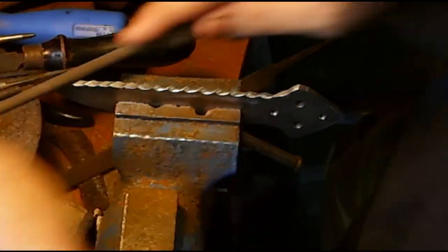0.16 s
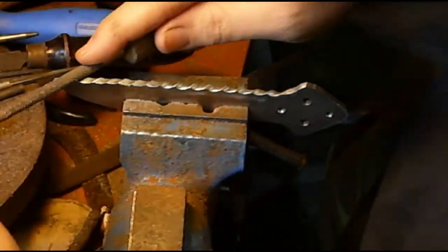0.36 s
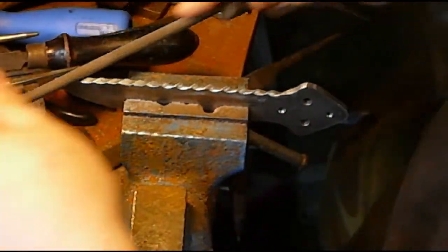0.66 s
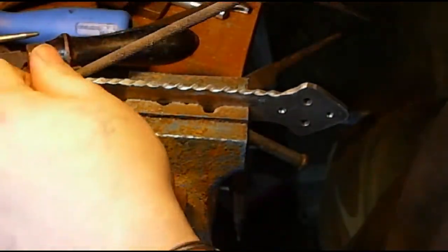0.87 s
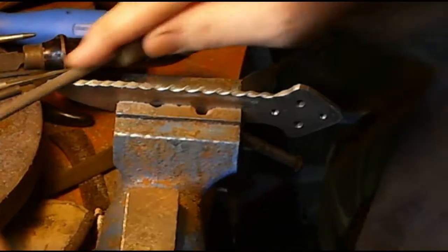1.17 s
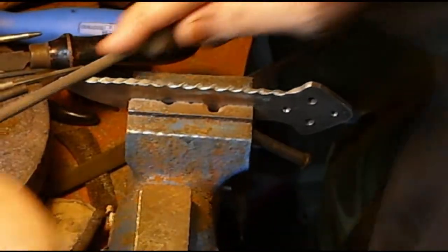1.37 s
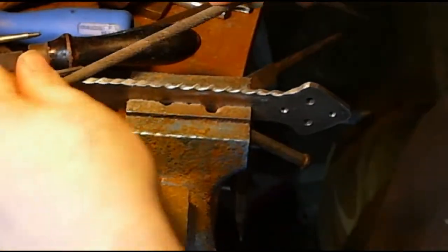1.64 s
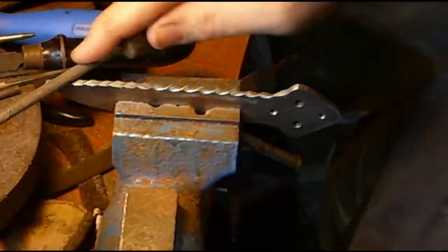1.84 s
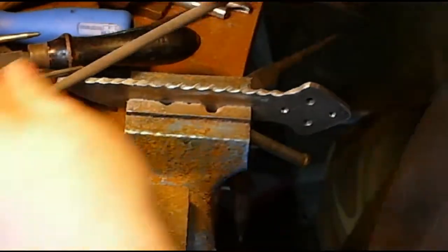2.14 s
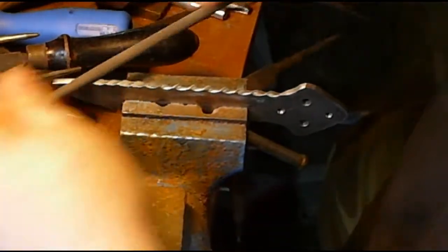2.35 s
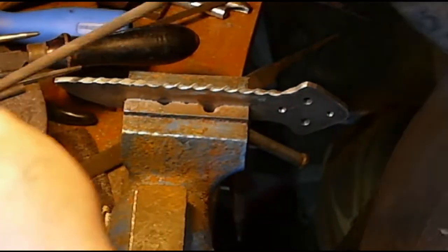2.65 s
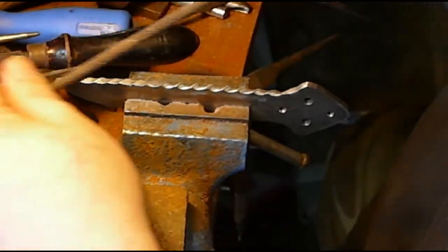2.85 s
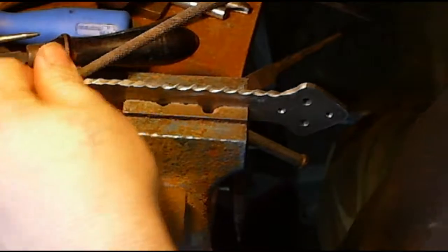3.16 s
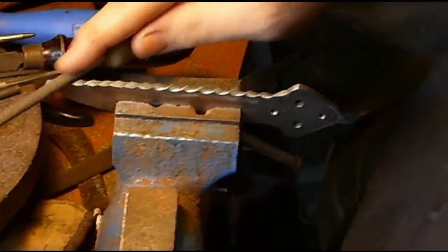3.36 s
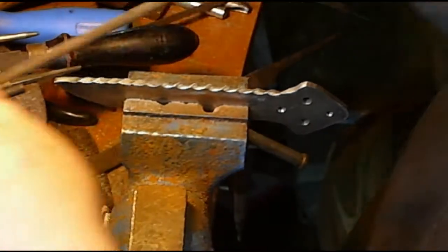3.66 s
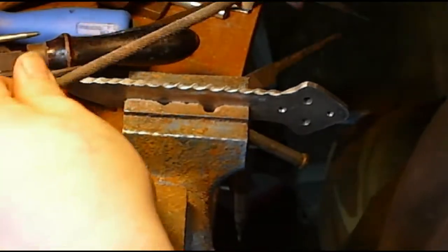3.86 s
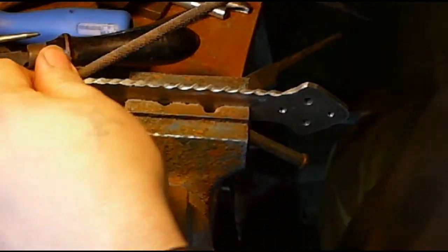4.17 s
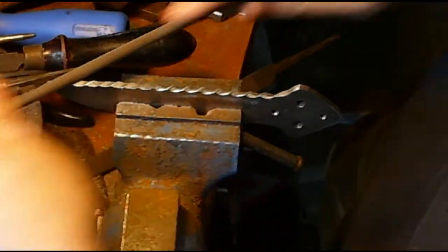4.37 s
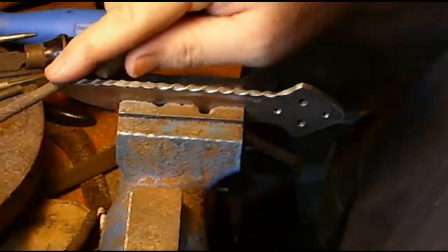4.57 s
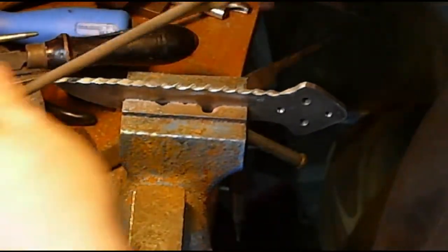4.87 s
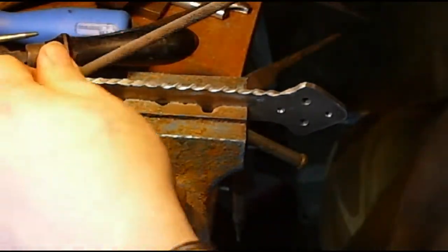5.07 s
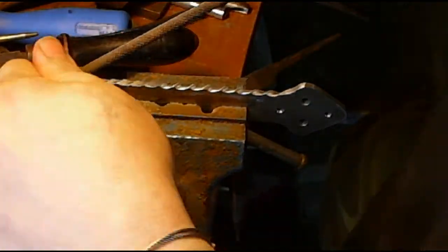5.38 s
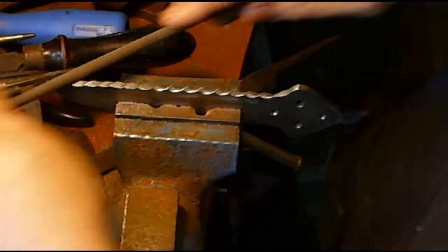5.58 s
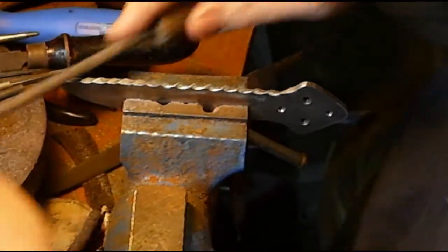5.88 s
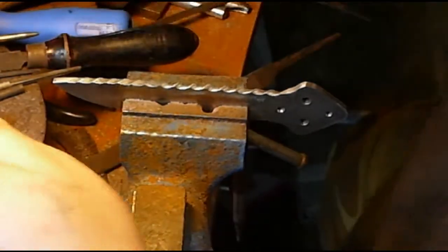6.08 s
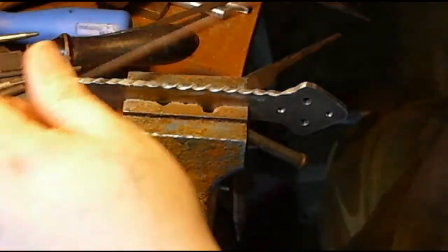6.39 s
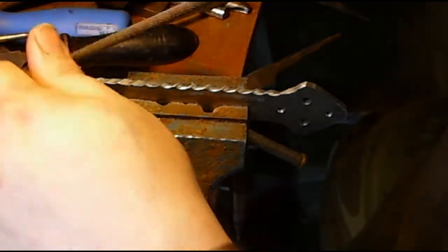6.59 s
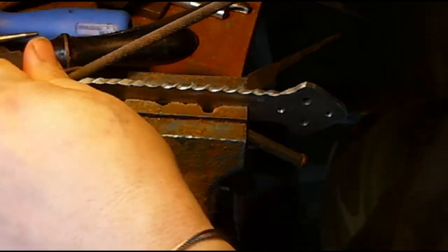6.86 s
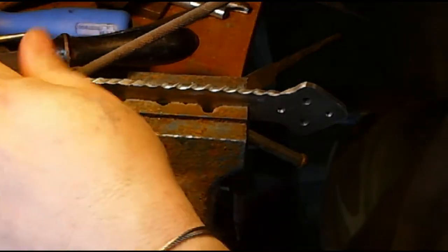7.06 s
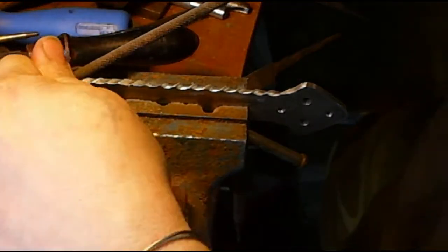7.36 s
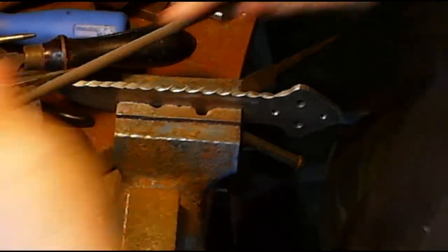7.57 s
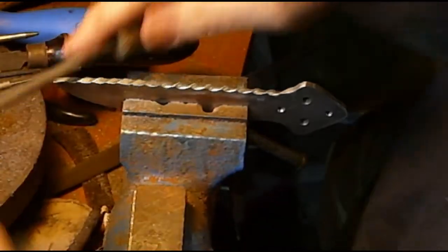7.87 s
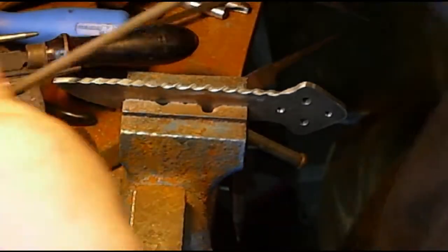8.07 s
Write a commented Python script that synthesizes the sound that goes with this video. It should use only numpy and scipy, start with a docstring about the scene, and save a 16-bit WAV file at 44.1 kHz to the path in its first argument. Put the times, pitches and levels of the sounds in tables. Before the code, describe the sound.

A round hand file rasps across a clamped steel blade in gritty strokes, with light skips, small ticks and two hard knocks midway.

```python
"""A small workshop with a low hum: a round hand file cuts notches into a knife blade clamped in a bench vise.
Catching teeth are uneven pulses plus grit, rung through the resonances of bench, vise and blade.
Between strokes the file skips lightly back, touches the blade, squeaks faintly and twice knocks on the steel.
Touches are filtered blows with chatter, squeaks are unsteady harmonics; a narrow-band microphone hears them.
A very bright overload click, one filtered impulse, is added after the microphone during the hard knock."""
import sys
import numpy as np
from scipy import signal
from scipy.fft import rfft, irfft
from scipy.io import wavfile

SR = 44100
rng = np.random.default_rng(int(sys.argv[2]) if len(sys.argv) > 2 else 0)


def transcribe(u):
    """Save the signal u as a 16-bit wav file named by the first command-line argument.

    u: samples, shape (n,) or (channels, n), limited to [-1, 1]; the rate is SR.
    q: integer samples, one column per channel.
    """
    v = np.clip(np.atleast_2d(u).T, -1, 1)
    q = np.round(v * 32767).astype(np.int16)
    wavfile.write(sys.argv[1], SR, q)


N = 362943
TIME = np.arange(N) / SR
SIZE = 16384  # samples per impulse response
HZ = np.maximum(np.fft.rfftfreq(SIZE, 1 / SR), 1)
EDGE_DB = 20  # change over one lead-in, attack or release


def from_db(db):
    """Decibels to gain."""
    return np.exp(np.asarray(db) * (np.log(10) / 20))


def rms_one(x):
    """Scale to rms 1."""
    return x / np.sqrt(np.mean(x ** 2) + 1e-20)


def convolve(x, response):
    """Play x through an impulse response."""
    return signal.fftconvolve(x, response)[:N]


def drift(rate_hz):
    """Random course: normal draws at rate_hz, joined by straight lines."""
    return np.interp(TIME * rate_hz, np.arange(N), rng.standard_normal(N))


def shape_db(points):
    """Spectrum points joined on a log-frequency axis."""
    hz, db = np.transpose(points)
    return np.interp(np.log(HZ), np.log(hz), db)


def causal(gain):
    """Minimum-phase impulse response of a gain spectrum, by folding its cepstrum."""
    cepstrum = irfft(np.log(gain + 1e-9))
    cepstrum[1:SIZE // 2] *= 2
    cepstrum[SIZE // 2 + 1:] = 0
    return irfft(np.exp(rfft(cepstrum)))


def band(low_hz, high_hz, order=8):
    """Band gain with smooth edges, steeper for a higher order."""
    low_edge = 1 + (low_hz / HZ) ** (2 * order)
    high_edge = 1 + (HZ / high_hz) ** (2 * order)
    return 1 / np.sqrt(low_edge * high_edge)


def shake(force, gain):
    """A white force rings through a gain spectrum and keeps its rms."""
    response = causal(gain)
    return convolve(force, response / np.linalg.norm(response))


# rumble and hiss spectrum: (frequency [Hz], relative density [dB])
FLOOR_SPECTRUM = [(7, -5), (20, -3.5), (29, 0), (35, 9), (43, -7), (72, -11), (100, -12.5), (160, -21.5),
                  (270, -25.5), (850, -29), (1150, -33.5), (1700, -35.5), (3900, -38.5)]
# steady hum: (frequency [Hz], rms before wavering [dB])
HUM_TONES = [(53.3, -53), (120, -76), (147, -71)]
FLOOR_DB = -50


def background():
    """Low rumble and faint hiss are shaped noise; hum is sines wavering in pitch and level."""
    rumble = shake(rng.standard_normal(N), from_db(shape_db(FLOOR_SPECTRUM)))
    clock_s = np.cumsum(1 + 0.015 * drift(3.7)) / SR
    hum = np.zeros(N)
    for hz, db in HUM_TONES:
        hum += from_db(db) * np.sqrt(2) * np.sin(2 * np.pi * (hz * clock_s + rng.random()))
    return from_db(FLOOR_DB) * rumble + from_db(0.61 * drift(9.5)) * hum


LANDING_DB = 12  # teeth engage this far below the full push
PUSH_CURVE, EASE_ROUNDING = 2.4, .45  # squareness of the rise; rounded share of the release


def push_db(engages_s, lead_in_s, attack_s, release_s):
    """The file settles on the steel, the push swells in an arch, then dies away at a steady rate."""
    age_s = TIME - engages_s
    settling = np.clip(-age_s / lead_in_s, 0, 10)
    rise = np.clip(1 - age_s / attack_s, 0, 1)
    fall = np.maximum(age_s - attack_s, 0) / release_s
    ease = np.hypot(fall, EASE_ROUNDING) - EASE_ROUNDING
    ease /= np.hypot(1, EASE_ROUNDING) - EASE_ROUNDING
    return -LANDING_DB * rise ** PUSH_CURVE - EDGE_DB * (settling + ease)


# cutting strokes: (engage time [s], lead-in [s], time to full push [s], release [s], relative vise bite [dB],
#   bench shake re bite [dB], blade ring re bite [dB], tooth rasp re bite [dB])
CUT_STROKES = [ (-0.1, .05, 0.13, .14, -34, -3, -16.5, -13.5), (0.25, .012, 0.21, .25, -43, -2, -3, -9),
               (0.808, .012, .125, .185, -35.5, -2, -14, -11.5),
               (1.14, 0.062, 0.093, .19, -38, -0.5, -3.5, -7.5),
               (1.503, 0.014, .11, 0.15, -37.5, -1, -9, -10),
               (1.79, .03, 0.074, .165, -38.5, -1, -4.5, -5.5),
               (2.116, .012, .065, .145, -40.5, -1.5, -2.5, -10), (2.985, .04, .15, .17, -34, -2, -15, -11),
               (4.1, 0.068, .175, .195, -34.5, 0, -13.5, -12.5),
               (5.312, .1, .125, .205, -36, -0.5, -14, -11.5), (7.335, .075, .11, .2, -34.5, 0, -14, -11.5),
               ]
# brief level changes within a stroke: (time [s], vise change [dB], blade ring change [dB], rasp change [dB])
TONE_TURNS = [(0.445, 3, 8, 1), (0.57, 1, 5, 3), (1.235, 4, 8, 6), (1.665, 6, -17.5, -7),
              (1.857, 2, -2, 5.5), (1.915, 1, 11, 0), (2.238, 1, 7, 1), (3.17, 4, -2, 1.5),
              (4.365, 8, -2, 0.5), (5.365, 4, 7, 1.5), (5.465, 5, -6, 2), (7.395, 3, 3.5, -0.5)]
BENCH_FOLLOWS, RING_FOLLOWS, RASP_FOLLOWS = 0.84, 1.55, 1.32  # dB per dB of push
TURN_S = .015  # time from the centre of a turn to 1/e of its dB change
BENCH_LAG_S = 0.0083  # the heavy bench takes a moment to get going


def stroke_gains():
    """One push drives vise, bench, blade ring and rasp; turns briefly change all but the bench."""
    bite, weight, ring, rasp = np.zeros((4, N))
    for s, lead_in_s, attack_s, release_s, db, bench_db, ring_db, rasp_db in CUT_STROKES:
        push = push_db(s, lead_in_s, attack_s, release_s)
        bite += from_db(db + push)
        weight += from_db(db + bench_db + BENCH_FOLLOWS * push)
        ring += from_db(db + ring_db + RING_FOLLOWS * push)
        rasp += from_db(db + rasp_db + RASP_FOLLOWS * push)
    for s, vise_db, ring_db, rasp_db in TONE_TURNS:
        turn = np.exp(-np.minimum(np.abs(TIME - s) / TURN_S, 10) ** 2)
        bite *= from_db(vise_db * turn)
        ring *= from_db(ring_db * turn)
        rasp *= from_db(rasp_db * turn)
    weight = np.interp(TIME - BENCH_LAG_S, TIME, weight)
    return bite, weight, ring, rasp


def teeth(per_s, jitter, uneven_db, grit):
    """Teeth catch at an unsteady rate, each with its own strength; loose filings add grit as noise."""
    rate_hz = per_s * np.exp(jitter * drift(400))
    passed = np.floor(np.cumsum(rate_hz) / SR)
    strength = from_db(uneven_db * np.clip(rng.standard_normal(N), -2, 2))
    catches = np.diff(passed, prepend=0) * strength / np.sqrt(per_s)
    catches = signal.lfilter([1, -1], [1, -.995], catches)  # DC blocker
    return rms_one(rms_one(catches) + grit * rng.standard_normal(N))


# resonances of bench, vise and blade: (frequency [Hz], width [Hz], lift at ringing 1 [dB])
STEEL_MODES = [(151.4, 6.7, 8), (235, 12, 4), (301, 13, 4), (386, 8.7, 13), (508, 21, 6), (587, 13, 5.5),
               (661, 24, 5.5), (762.5, 5.7, 10), (803.6, 35, 10), (864, 8, 1.5), (985, 14, 4),
               (1020, 31, 6), (1143, 14, 4.5), (1267, 18, 6.5), (1775, 20, 7), (1846, 77, 5.5),
               (1906, 19, 9), (1935, 19, 4.5), (1960, 17, 3.5), (2190, 8.2, 5.5), (2430, 65, 4.5),
               (2600, 90, 6.5), (2560, 26, 0.5), (2810, 34, 2), (2750, 77, 4), (3024, 71, 8.5),
               (3080, 18, 7.5), (3410, 290, 3), (3700, 52, -0.5), (3680, 36, 3)]


def steel(colour, ringing):
    """Gain from contact point to air: resonances stand on a broad colour."""
    power = np.ones_like(HZ)
    for hz, width_hz, lift_db in STEEL_MODES:
        power += (from_db(2 * lift_db * ringing) - 1) / (1 + (2 * (HZ - hz) / width_hz) ** 2)
    return from_db(shape_db(colour)) * np.sqrt(np.maximum(power, .1)) * band(1, 4300, order=12)


def wander(force, gain, low_hz, high_hz, patchy_db, per_s, count):
    """The contact moves from tooth to tooth and favours now one group of resonances, now another."""
    edges_hz = np.geomspace(low_hz, high_hz, count + 1)
    groups = [causal(gain * band(low, high, order=24)) for low, high in zip(edges_hz, edges_hz[1:])]
    out = np.zeros(N)
    for group in groups:
        out += convolve(force * from_db(patchy_db * drift(per_s)), group)
    return out / np.linalg.norm(groups)


# broad colour of the cut: (frequency [Hz], relative density [dB])
CUT_SPECTRUM = [(50, -2), (95, -1), (170, 0), (260, -5.5), (430, -6), (560, -1.5), (680, -2.5), (830, -6),
                (980, -4.5), (1150, -12), (1480, -18), (1750, -15), (2800, -9), (3900, -14)]


def cutting():
    """Teeth catch faster in harder strokes; blade ring is set per stroke and fades faster than the bite."""
    bite, weight, ring, rasp = stroke_gains()
    speed = (bite / bite.max() + .01) ** .3
    force = teeth(600 * speed, jitter=.2, uneven_db=4.5, grit=0.86)
    # the whole file judders more slowly than single teeth catch
    judder = teeth(260 * speed, jitter=.45, uneven_db=7.5, grit=1.1)
    held, free = steel(CUT_SPECTRUM, ringing=0.89), steel(CUT_SPECTRUM, ringing=1.9)
    bench = from_db(-0.36) * shake(judder * weight, held * band(30, 540))
    vise_force = force * bite * from_db(1.1 * drift(70))
    vise = from_db(-1.84) * shake(vise_force, held * band(604, 1550))
    # squared gains: mainly heavy strokes make the bench top boom and the jaws sing
    boom_force = force * weight * (weight / weight.max())
    boom = from_db(-0.5) * shake(boom_force, held * band(85, 165, order=4))
    jaw_force = judder * bite * (bite / bite.max())
    jaws = from_db(0.5) * shake(jaw_force, held * band(823, 844))
    blade = from_db(-4.5) * wander(force * ring, free, 1228, 2260, patchy_db=4.5, per_s=70, count=3)
    tips = from_db(0.5) * wander(force * rasp, held, 2258, 3066, patchy_db=3.5, per_s=70, count=3)
    # fine chips tear off under weight
    tearing = rasp * ((weight + 1e-9) / (rasp + 1e-9)) ** 0.34
    chips = from_db(-8) * wander(force * tearing, held, 3030, 3854, patchy_db=4, per_s=60, count=2)
    # faint noise above 4 kHz follows the rasp
    upper_leak = from_db(-3) * shake(force * rasp, band(4100, 5200))
    return bench + vise + boom + jaws + blade + tips + chips + upper_leak


# slides with hardly any pressure: (time [s], length [s], relative vise level [dB], relative blade ring [dB])
LIGHT_SLIDES = [ (0.244, 0.064, -46.5, -56), (1.325, 0.022, -46.5, -44), (2.404, 0.034, -57.5, -66.5),
                (2.563, 0.0066, -55.5, -76), (2.678, 0.1, -51, -60), (3.311, 0.028, -44.5, -50),
                (3.49, .025, -56.5, -64), (3.668, 0.12, -53, -73), (3.805, 0.088, -50, -61),
                (4.472, 0.024, -50.5, -60.5), (4.835, 0.053, -58.5, -59.5), (5.105, 0.013, -62.5, -77),
                (5.683, 0.033, -49, -63), (6.544, 0.013, -56, -60.5), (6.671, 0.077, -57.5, -81),
                (6.89, 0.0083, -54, -56.5), (7.673, 0.018, -55.5, -56), (7.859, 0.028, -55.5, -63.5),
                (8.011, 0.068, -47.5, -60), (8.118, 0.046, -50, -58.5), ]
SLIDE_ATTACK_S, SLIDE_RELEASE_S = 0.0087, .055  # time per EDGE_DB


def slide_gains():
    """Each light slide sets in quickly, holds and fades; gains of vise and blade."""
    touch, ring = np.zeros((2, N))
    for s, length_s, db, ring_db in LIGHT_SLIDES:
        before = np.maximum(s - TIME, 0) / SLIDE_ATTACK_S
        after = np.maximum(TIME - s - length_s, 0) / SLIDE_RELEASE_S
        contact = from_db(-EDGE_DB * np.minimum(before + after, 10))
        touch += from_db(db) * contact
        ring += from_db(ring_db) * contact
    return touch, ring


# broad colour of a slide: (frequency [Hz], relative density [dB])
SLIDE_SPECTRUM = [(80, -11), (300, -2.5), (550, -4), (720, -4.5), (900, -2.5), (1150, -8), (1600, -21.5),
                  (1880, -13.5), (2300, -17), (2850, -18), (3300, -20.5), (3900, -24.5)]


def sliding():
    """Drawn back, the file skips over the tips of its teeth: uneven catches and grit."""
    force = teeth(np.full(N, 420.), jitter=0.54, uneven_db=6, grit=1.0) * from_db(3.2 * drift(55))
    body = steel(SLIDE_SPECTRUM, ringing=1.3)
    touch, ring = slide_gains()
    vise = from_db(-1.5) * shake(force * touch, body * band(630, 2300, order=2))
    blade = from_db(-4) * wander(force * ring, body, 1670, 4100, patchy_db=0.5, per_s=33, count=4)
    return vise + blade


# file strikes blade: (time [s], relative level [dB])
BLADE_TAPS = [(0.253, -32), (0.295, -30.5), (0.363, -39), (0.582, -31), (0.629, -37.5), (0.687, -31.5),
              (0.813, -39.5), (1.507, -35), (2.122, -41), (2.559, -43), (2.675, -36.5), (2.964, -44),
              (2.996, -33), (3.665, -36), (3.73, -35), (4.07, -38.5), (4.827, -40.5), (5.353, -29.5),
              (5.455, -27.5), (5.685, -38.5), (5.982, -22), (5.986, -16), (5.989, -16), (6.003, -20),
              (6.201, -17.5), (6.206, -19), (6.681, -39.5), (6.891, -44), (8.007, -33.5), (8.037, -44)]
# broad colour of a strike: (frequency [Hz], relative density [dB])
TAP_SPECTRUM = [(60, -13.5), (250, -8), (550, -4), (860, 1), (1150, -7.5), (1450, -16.5), (1900, -14),
                (2150, -12), (2600, -5.5), (3000, -10), (3350, -12.5), (3900, -12.5)]
# the file's own ring: (frequency [Hz], width [Hz], lift at full hardness [dB])
FILE_MODE = (2530, 230, 3.6)


def tapping(chatter_s=0.009, chatter=0.22, bright_per_db=0.4, blow_db=13.5, hard_db=-30):
    """A blow and milliseconds of chatter; hard blows are brighter and ring the file too."""
    body, out = steel(TAP_SPECTRUM, ringing=0.34), np.zeros(N + SIZE)
    age_s = TIME[:SIZE // 16]
    hz, width_hz, lift_db = FILE_MODE
    file_db = lift_db / (1 + (2 * (HZ - hz) / width_hz) ** 2)
    treble = band(1900, 9800, order=4)
    for s, db in BLADE_TAPS:
        force = chatter * rng.standard_normal(len(age_s)) * np.exp(-age_s / chatter_s)
        force[0] += 1
        hardness = np.clip((db - hard_db) / 10, 0, 1)
        bright_db = bright_per_db * (db - hard_db) * treble
        response = causal(body * from_db(hardness * file_db + bright_db))
        blow = signal.fftconvolve(force, response)[:SIZE]
        start = int(s * SR)
        out[start:start + SIZE] += from_db(db + blow_db) * blow / np.linalg.norm(blow)
    return out[:N]


# faint squeaks: (time [s], length [s], mean pitch [Hz], rms before arch and flutter [dB])
FILE_SQUEAKS = [(5.819, 0.08, 698.6, -54.5), (5.909, 0.075, 692.3, -60.5)]
# squeak partials: (multiple of pitch [1], relative level [dB])
SQUEAK_PARTIALS = [(1, 1.5), (2, -7.5), (3, -13), (4, -15), (5, -10.5)]


def squeaking(waver=0.013, rough_db=4.0):
    """Stick and slip settle into a brief, unsteady tone: harmonics of a wavering pitch."""
    out = np.zeros(N)
    bend, flutter = 1 + waver * drift(120), from_db(rough_db * drift(150))
    for s, length_s, hz, db in FILE_SQUEAKS:
        on = (TIME > s) & (TIME < s + length_s)
        turns = np.cumsum(hz * bend[on]) / SR
        tone = sum(from_db(tone_db) * np.sin(2 * np.pi * k * turns) for k, tone_db in SQUEAK_PARTIALS)
        arch = np.sin(np.pi * (TIME[on] - s) / length_s)
        out[on] += from_db(db) * rms_one(tone) * flutter[on] * arch
    return out


def overload_click(s=5.991, db=-8.5):
    """A very bright overload click during the hard knock: one band-passed impulse."""
    spike = np.zeros(N)
    spike[round(s * SR)] = from_db(db)
    return convolve(spike, causal(band(6200, 11600, order=3)))


# near surfaces: (delay [s], level re direct [dB])
SURFACE_ECHOES = [(0.0174, -21), (0.0211, -19)]
ROOM_T60_S, ROOM_DB = 0.32, -10.5  # tail decay; tail energy re direct


def workshop(x):
    """Close surfaces return a few echoes, the clutter a short, dense tail of decaying noise."""
    age_s = TIME[:SIZE]
    tail = rng.standard_normal(SIZE) * from_db(-60 * age_s / ROOM_T60_S) * (1 - np.exp(-age_s / 0.0033))
    response = from_db(ROOM_DB) * tail / np.linalg.norm(tail)
    response[0] += 1
    for delay_s, db in SURFACE_ECHOES:
        response[int(delay_s * SR)] += from_db(db)
    return convolve(x, response / np.linalg.norm(response))


def scene():
    """File and steel in the workshop, over its hum and rumble."""
    file_on_steel = cutting() + sliding() + tapping() + squeaking()
    return (workshop(file_on_steel) + background())[None]


MIC_TOP_HZ, CUTOFF_HZ = 3900, 15500


def record(dry, mirror_db=-53, top=.14, hiss_db=-99, leak_db=-40):
    """The microphone rounds peaks and passes little above its narrow band; the click is added after it."""
    rounded = top * np.tanh(dry / top)
    mic_filter = signal.ellip(12, .1, 74, MIC_TOP_HZ, fs=SR, output="sos")
    narrow = signal.sosfilt(mic_filter, rounded)
    # a trace leaks past the filter; faint images mirror the band about 8 kHz
    leak = from_db(leak_db) * rounded
    mirror = from_db(mirror_db) * narrow * np.cos(2 * np.pi * 8000 * TIME)
    hiss = from_db(hiss_db) * rng.standard_normal(N)
    cutoff_filter = signal.ellip(10, .1, 80, CUTOFF_HZ, fs=SR, output="sos")
    return signal.sosfilt(cutoff_filter, narrow + leak + mirror + hiss + overload_click())


dry = scene()
out = record(dry)
transcribe(out)
```